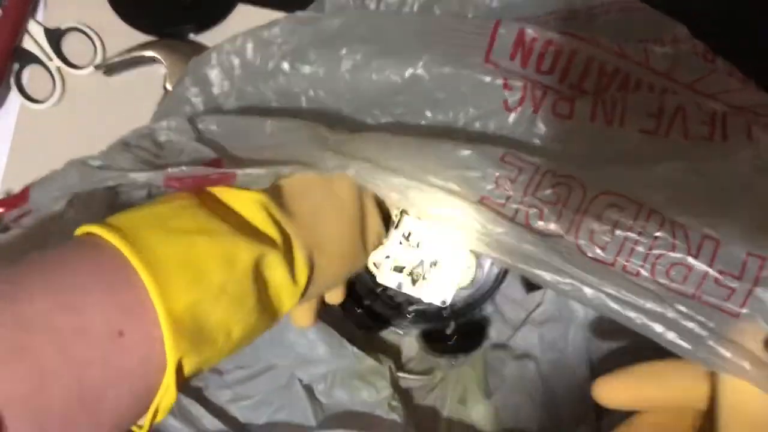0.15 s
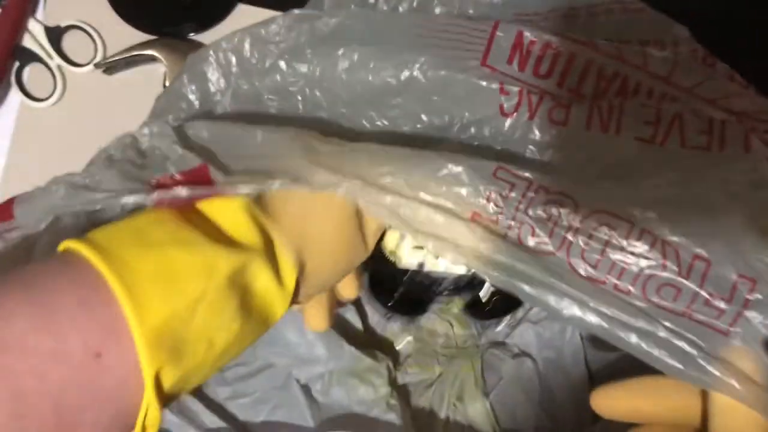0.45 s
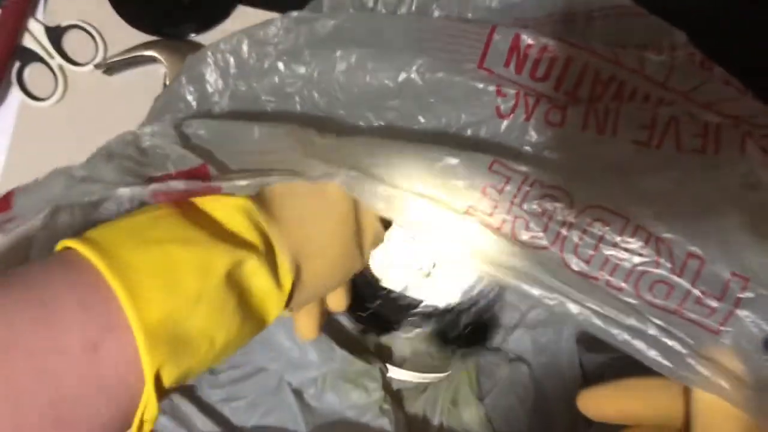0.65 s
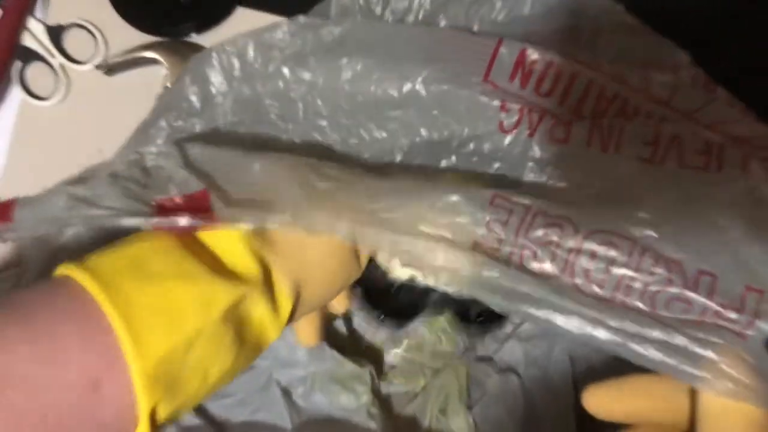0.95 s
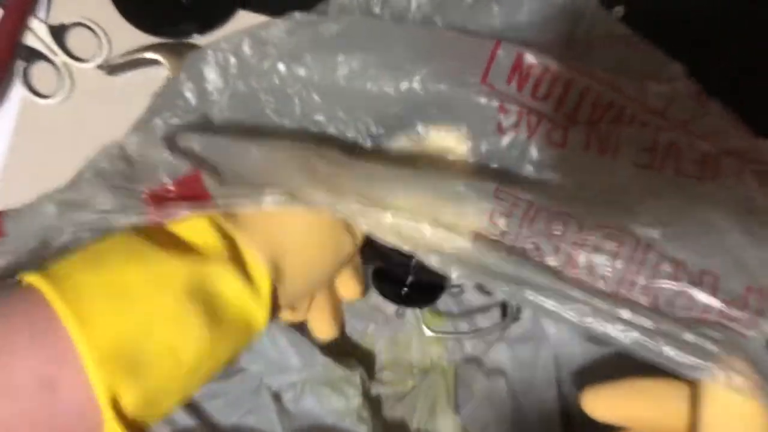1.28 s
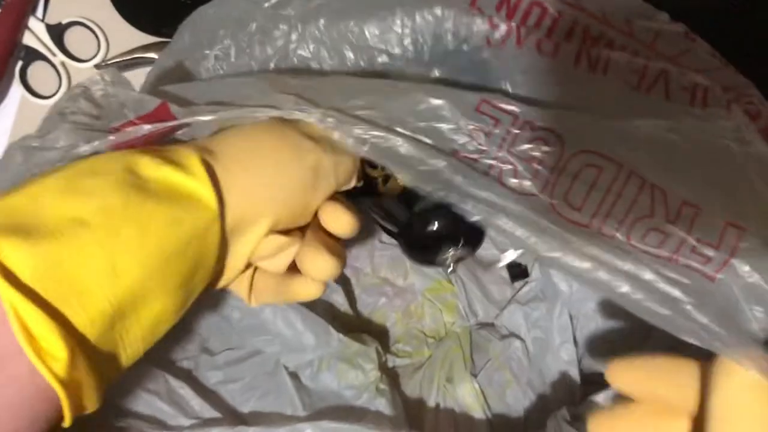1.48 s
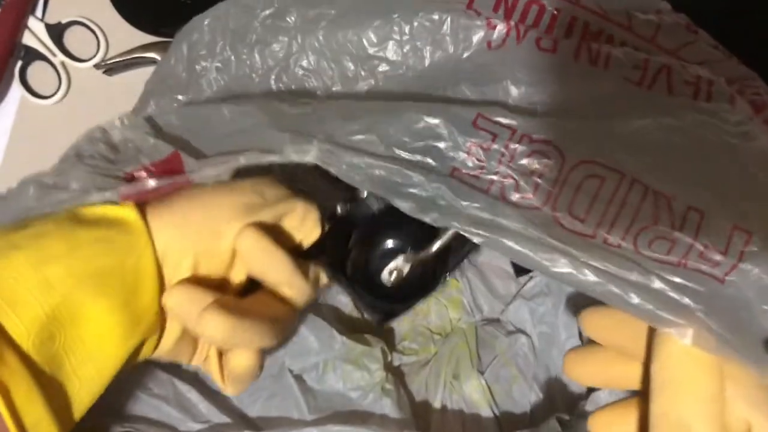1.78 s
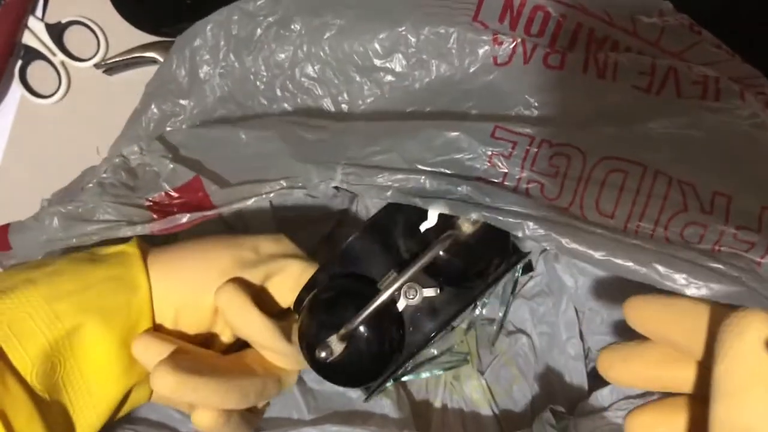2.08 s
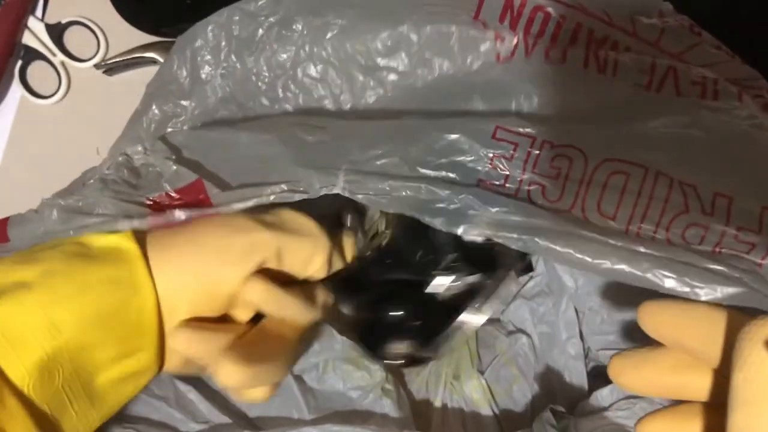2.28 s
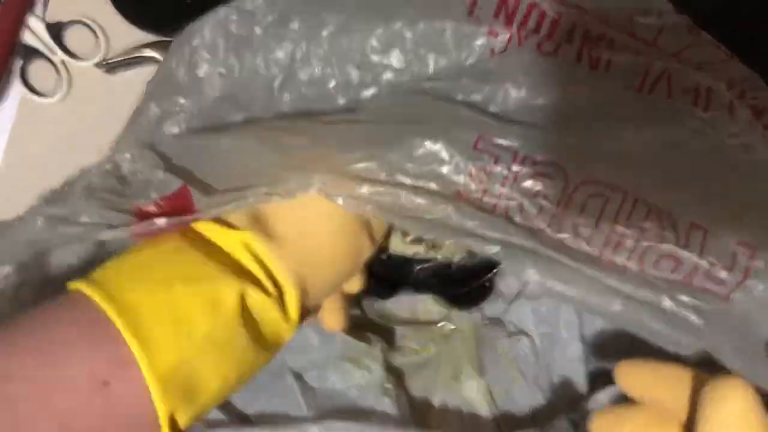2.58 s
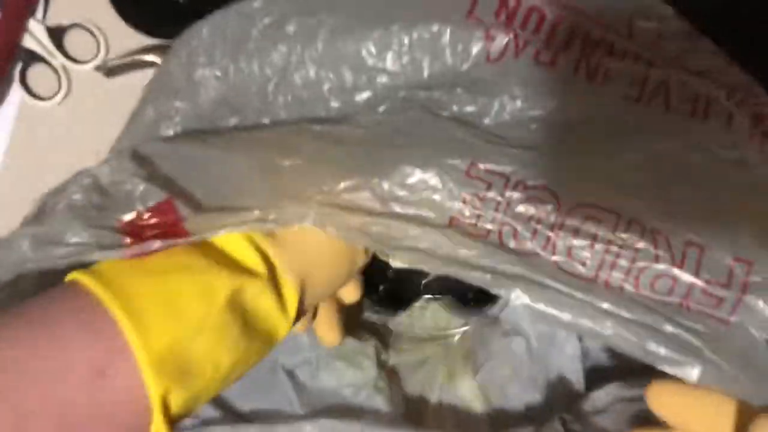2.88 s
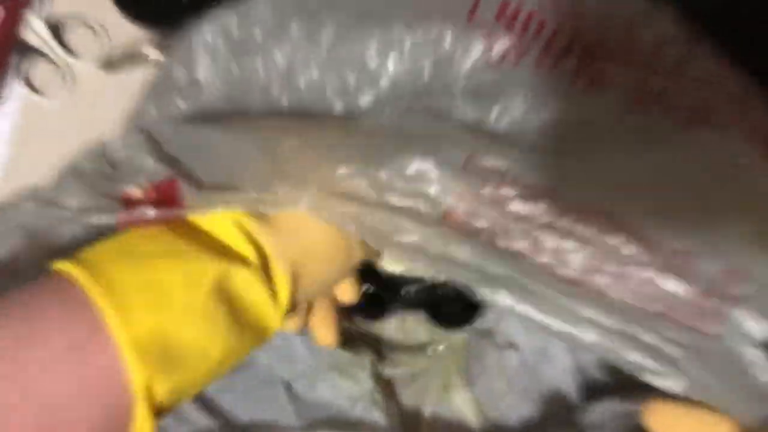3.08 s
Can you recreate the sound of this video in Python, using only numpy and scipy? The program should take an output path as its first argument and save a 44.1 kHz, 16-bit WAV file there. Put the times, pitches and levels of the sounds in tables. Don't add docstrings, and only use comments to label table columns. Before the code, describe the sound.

Broken glass rattles sharply against a hollow clock case shaken in a rustling plastic bag, pauses, then clatters and rings brighter as it is tipped, with table thuds; close phone microphone, quiet room.

```python
import sys
import numpy as np
from scipy import signal
from scipy.fft import rfft, irfft
from scipy.io import wavfile
from scipy.ndimage import uniform_filter1d

SR = 44100
rng = np.random.default_rng(int(sys.argv[2]) if len(sys.argv) > 2 else 0)


def put_to_file(sound):
    columns = np.atleast_2d(sound).T
    safe = np.clip(columns, -1, 1)
    whole_steps = np.round(safe * 32767)
    wavfile.write(sys.argv[1], SR, whole_steps.astype(np.int16))


def gain_from_db(level_db):
    decades = np.asarray(level_db, float) / 20
    return 10 ** decades


N = 143325
T = np.arange(N) / SR


def unit(x):
    return x / np.sqrt(np.mean(x ** 2))


def colour(x, points):
    hz, db = np.array(points).T
    f = np.maximum(np.arange(N // 2 + 1) * SR / N, 1)
    gain = gain_from_db(np.interp(np.log(f), np.log(hz), db, left=-60))
    return irfft(rfft(x) * gain, N)


def walk(rate):
    k = int(SR / rate)
    held = np.repeat(rng.standard_normal(N // k + 1), k)
    return unit(uniform_filter1d(held, k)[:N])


def crackle(rate, spread_db, smear_s):
    clicks = (rng.random(N) < rate / SR) * gain_from_db(spread_db * rng.exponential(size=N))
    envelope = signal.lfilter([1], [1, -np.exp(-1 / (smear_s * SR))], clicks)
    return unit(envelope * rng.standard_normal(N))


def halves(x):
    dull = signal.sosfiltfilt(signal.butter(2, 7800, fs=SR, output="sos"), x)
    return np.array([unit(dull), unit(x - dull)])


def patchy(x, depth_db, rate):
    spectrum = rfft(x)
    octave = np.log2(np.arange(N // 2 + 1) * SR / N + 1)
    total = 0
    for centre in np.arange(10, 15, 0.5):
        band = np.clip(1 - 2 * np.abs(octave - centre), 0, 1)
        total = total + irfft(spectrum * band, N) * gain_from_db(depth_db * walk(rate))
    return unit(total)


def ring(start, hz, t60):
    t = np.maximum(T - start, 0)
    return np.sin(2 * np.pi * hz * t) * np.exp(-np.log(1000) * t / t60), t


def room_hum():
    # f/Hz, level/dB
    room_tone = [(15, -37), (30, -18), (64, 7.5), (120, -7.5), (427, 1), (489, -8), (641, -11),
                 (9070, -21.5), (16000, -30)]
    return unit(colour(rng.standard_normal(N), room_tone)) * gain_from_db(-63 + walk(6.57))


def tinkles():
    out = np.zeros(N)
    t = T[:SR // 20]
    for place, pitch, size in rng.random((400, 3)):
        i = int(place * (N - len(t)))
        ping = np.sin(2 * np.pi * 1400 * 11 ** pitch * t) * np.exp(-t / 0.0015)
        out[i:i + len(t)] += size ** 2 * ping
    return out


def bag():
    # t/s, level/dB
    hand = [(0, -39), (.1, -43.5), (.23, -48.5), (.35, -47.5), (.41, -51), (.6, -47), (.77, -46.5),
            (.9, -45), (1.12, -43.5), (1.3, -46), (1.55, -51), (1.72, -59.5), (2.2, -64.5), (2.33, -44),
            (2.66, -47), (2.92, -41), (3.13, -43.5), (3.25, -45.5)]
    # f/Hz, level/dB
    plastic = [(88, -11), (150, -9), (348, -7), (391, -11), (439, -7), (1760, -7), (13700, -10),
               (16000, -14)]
    motion = gain_from_db(np.interp(T, *np.array(hand).T))
    dull = halves(colour(crackle(4000, 3.2, 0.00091), plastic))[0]
    bright = halves(colour(crackle(4000, 3.2, 0.00091), plastic))[1]
    rustle = gain_from_db(1.0 + 3.13 * walk(35)) * (dull + gain_from_db(-5.5 + 4.9 * walk(24.74)) * bright)
    return motion * (rustle + gain_from_db(7.5) * tinkles())


def knock_power():
    # t/s, peak level/dB, shares of case/dB, thick glass/dB, thin glass/dB
    shake = [(0.007, -26.5, -1.5, -17.5, -20), (0.072, -19.5, -5, -15, -14), (0.114, -18, -13, -11.5, -7),
             (0.136, -3, -28, -13.5, -6.5), (0.157, -17.5, -25, -12, -20), (0.196, -26, 2, -17, -23),
             (0.252, -20.5, -3, -14, -16), (0.315, -15.5, -22, -11, -5), (0.327, -19.5, -1.5, -10.5, -17),
             (0.339, -12.5, -4.5, -11, -13), (0.349, -14, -26.5, -10, -7.5), (0.36, -14.5, -24, -18, -8),
             (0.425, -21, -1, -24, -9), (0.439, -29, -1, -3.5, -11), (0.474, -15, -21, -11, -7),
             (0.488, -14.5, -8, -10.5, -22), (0.508, -16.5, -11, -17, -12), (0.548, -22.5, -7.5, -5.5, -31),
             (0.602, -37, -4, 0, -11), (0.632, -7, -24.5, -5, -20), (0.651, -10.5, -11, -10.5, -17),
             (0.66, -12, -19, -19, -12), (0.713, -18.5, -11, -14, -3), (0.724, -18.5, -18, -20, -4),
             (0.801, -9, -10, -14.5, -7), (0.812, -10, -0.5, -12, -11), (0.822, -13, -20, -5, -21),
             (0.857, -26, -22.5, -15, -5), (0.889, -16, -7, -21, -9.5)]
    late = [
        (0.925, -24, -7, -9, -17),
        (0.978, -3, -2, -10, -9.5),
        (1.031, -20.5, -23, -17, -6),
        (1.095, -24.5, -2.5, -10, -18),
        (1.151, -11.5, -6, -13, -20),
        (1.172, -16.5, -16, -21, -4),
        (1.206, -20, -4.5, -10.5, -19.5),
        (1.258, -24.5, -6.5, -7, -20),
    ]
    tip = [(2.262, -27, -15, -15.5, -11), (2.273, -24, -21, -9, -10), (2.281, -22.5, -21, -9.5, -10),
           (2.305, -20.5, -19.5, -10, -8), (2.333, -7.5, -23.5, -14, -8), (2.445, -13, -25.5, -16, -14),
           (2.459, -6.5, -32, -14, -17), (2.49, -3, -33, -20.5, -10.5), (2.535, -12.5, -10.5, -24, 1.5),
           (2.582, -12.5, -15, -17, -4), (2.665, -23, -11, -16, -9.5), (2.712, -20, -4, -9, -18),
           (2.728, -18, -20, -5.5, -18.5), (2.78, -5, -12, -8.5, -11.5), (2.836, -10.5, -24, -15.5, -9),
           (2.893, -6.5, -28, -16.5, -5), (2.936, -8.5, -23, -18, -12), (2.939, -4.5, -12.5, -14, -13),
           (2.991, -14, -14, -12, -13), (3.001, -10, -31, -20, -7)]
    # t/s, peak level/dB, shares of low/dB, middle/dB, top/dB
    snaps = [
        (1.504, -27.5, -27, -15, -8),
        (1.814, -26.5, -12, -11, -25),
        (1.84, -21, -28, -13, -16),
        (1.856, -24, -30, -11, -16),
        (2.023, -38.5, -16, -6, -6),
    ]
    power = np.zeros((3, N))
    t = T[:SR // 10]
    crack = np.exp(-(t / 0.0035) ** 2)
    tail = gain_from_db(-11) * np.exp(-t / 0.0081)
    shape = (1 - np.exp(-t / 0.00061)) * (crack + tail)
    for s, db, *share_db in list(shake) + list(late) + list(tip) + list(snaps):
        i = int(s * SR)
        shares = gain_from_db(share_db)[:, None]
        power[:, i:i + len(t)] += (gain_from_db(db - 13.5) * shape * shares) ** 2
    return power


def slide_power():
    # middle t/s, level/dB, case share/dB, half length/s, thin over thick glass/dB
    slides = [(0.02, -46, 0, 0.049, 4.5), (0.141, -29.5, -1.5, 0.016, -2.5), (0.265, -43, 0.5, 0.028, -4.5),
              (0.328, -36, -7, 0.019, -4), (0.492, -29, -2.5, 0.021, -0.5), (0.656, -27.5, 0, .016, -2),
              (0.729, -39.5, -10, .011, 4), (.82, -28.5, -2.5, 0.023, 2), (0.883, -38.5, -6, 0.022, 2),
              (.989, -23.5, -1.5, 0.011, 4.5), (1.087, -39, -5, 0.02, 2), (1.158, -25, 1, 0.012, 3.5),
              (1.266, -41, -10, 0.032, -3), (2.351, -36.5, -11, .027, 6), (2.431, -39, -1.5, 0.0139, -7),
              (2.461, -44.5, -6, .008, 5), (2.541, -27, -9, 0.0097, 3), (2.587, -30, 1, 0.024, -0.5),
              (2.722, -36.5, -4, 0.0071, -4), (2.846, -30, -9, 0.011, 2), (2.903, -24.5, -4.5, 0.023, 2),
              (2.941, -26, -3.5, 0.011, 3.5), (3.013, -33.5, -19, 0.0157, 5), (3.061, -34, -8, 0.0146, -3),
              (3.178, -38.5, -4.5, .027, -3)]
    power = np.zeros((3, N))
    rough = gain_from_db(2.46 * walk(250))
    for s, db, case_db, half, tilt_db in slides:
        envelope = gain_from_db(db) * rough * np.exp(-np.abs((T - s) / (0.92 * half)) ** 3.18)
        shares = gain_from_db([case_db, -4 - tilt_db / 2, -5.5 + tilt_db / 2])[:, None]
        power += (envelope * shares) ** 2
    return power


def hollow_case(push):
    # f/Hz, width/Hz, level/dB
    resonances = [(486, 220, -3), (827, 347, -0.5), (1023, 78, 3), (1442, 134, 1.5), (1743, 137, 6),
                  (2114, 113, 1)]
    body = 0
    for k, (hz, width_hz, db) in enumerate(resonances):
        answer = signal.lfilter(*signal.iirpeak(hz, hz / width_hz, SR), push)
        body = body + (-1) ** k * gain_from_db(db) * answer
    return body


def chips():
    # f/Hz, level/dB
    glass = [(1180, -3.5), (2000, -10.5), (2490, -6), (5440, -3.5), (13600, -2), (14800, -1.5),
             (16000, -7.5)]
    knock, slide = knock_power(), slide_power()
    scrape = halves(patchy(colour(crackle(7900, 1.4, 0.00055), glass), 2.1, 150))
    crack = halves(patchy(colour(rng.standard_normal(N), glass), 3.9, 120))
    chip_sound = np.sqrt(slide[1:]) * scrape + gain_from_db(9) * np.sqrt(knock[1:]) * crack
    push = np.sqrt(slide[0]) * crackle(2500, 3.3, 0.00015)
    push += gain_from_db(4) * np.sqrt(knock[0]) * rng.standard_normal(N)
    return chip_sound.sum(axis=0) + gain_from_db(11.5) * hollow_case(push)


def thumps():
    # t/s, level/dB, hollow knock/dB, drum share/dB, leg sway/dB
    hits = [
        (.136, -23.5, -21, 2.5, -60.5),
        (.492, -32.5, -21, -4.5, -63.5),
        (0.658, -34, -29, -3, -59.5),
        (.815, -30.5, -22.5, 0.5, -64),
        (0.98, -29, -19, 0, -72),
        (1.155, -30, -28, -6, -57.5),
        (2.428, -40.5, -47, 2.5, -58),
        (2.576, -22, -7, -3, -42.5),
        (2.895, -18.5, -19.5, 4.5, -42.5),
    ]
    # f/Hz, level/dB, time to fall 60 dB/s
    table_top = [(44.6, -19, 0.47), (136.9, -9, 0.24), (188.15, -4.5, .13), (213.8, -18.5, 0.37),
                 (344.3, -12, 0.15), (450.4, -4, 0.0704)]
    out = 0
    for s, db, knock_db, drum_db, sway_db in hits:
        drum = (282.7, drum_db + 6, 0.051)
        for hz, mode_db, t60 in list(table_top) + [drum]:
            tone, t = ring(s, hz, t60)
            swell = 1 - np.exp(-t * hz / 0.53)
            out = out + gain_from_db(db + mode_db) * tone * swell
        sway, t = ring(s, 76.2, 2.9)
        out = out + gain_from_db(sway_db + 3.5) * sway * np.sin(np.pi * 4.04 * t)
        knock, t = ring(s - 0.002, 855, 0.012)
        out = out + gain_from_db(knock_db + 9) * knock * (1 - np.exp(-t / 0.0015))
    return out


def shards():
    # t/s, level/dB, flight/s
    ringing = [
        ([(5340, 0.5, 0.15), (7520, -14, 0.275), (12660, -1.5, .2), (14740, -12, 0.36)], [(2.282, -35, .14), (2.325, -29.5, 0.104), (2.447, -27.5, .085), (2.46, -15.5, 0.01), (2.468, -37, .06), (2.491, -27, 0.034), (3.003, -32, 0.0286), (3.102, -36.5, 0.011)]),
        ([(11450, -.5, 0.061)], [(2.337, -29, .02), (2.452, -11, 0.015), (2.461, -14, 0.036), (2.491, -12, .045)]),
        ([(14070, 1, 0.097)], [(2.452, -25, .02), (2.491, -15, .035)]),
        ([(7165, -0.5, 0.19)], [(2.461, -16.5, .06), (2.714, -48, 0.01), (2.895, -26, 0.011), (3.003, -23, 0.03)]),
        ([(9985, -2, 0.052), (4630, -10.5, 0.067), (15590, -7, .09)], [(2.491, -15, 0.045), (2.933, -18, 0.037), (3.004, -22, 0.028)]),
        ([(12250, 1.5, 0.22), (15620, -11.5, .15)], [(.858, -33, .005), (2.838, -24.5, 0.0073), (2.933, -22, 0.054)]),
        ([(14500, 0.5, 0.134)], [(.83, -27, .004), (.94, -37.5, .014), (1.045, -36, 0.018), (1.22, -35.5, .03)]),
    ]
    out = 0
    for modes, clinks in ringing:
        for hz, mode_db, t60 in modes:
            power = 0
            for s, db, flight in clinks:
                t = np.maximum(T - s, 0)
                landing = np.maximum(t - flight, 0) / 0.0018
                fade = np.log(1000) * t / t60 + landing
                attack = np.minimum(t / 0.00035, 1)
                power = power + (gain_from_db(db + mode_db) * attack * np.exp(-fade)) ** 2
            out = out + np.sqrt(power) * np.sin(2 * np.pi * hz * T) * gain_from_db(1.94 * walk(150))
    return out


def room_echo(near):
    t = T[:SR // 3]
    tail = rng.standard_normal(len(t)) * np.exp(-np.log(1000) * t / 0.36)
    tail *= t > 0.004
    return signal.fftconvolve(near, tail / np.sqrt(np.sum(tail ** 2)))[:N]


def scene():
    near = bag() + chips() + thumps() + shards()
    return (near + gain_from_db(-13.5) * room_echo(near) + room_hum())[None]


def band_limit(x):
    return signal.sosfilt(signal.butter(12, 17030, fs=SR, output="sos"), x)


def record(dry):
    low_pass = signal.ellip(12, 0.2, 45, 15850, fs=SR, output="sos")
    return band_limit(signal.sosfilt(low_pass, dry))


dry = scene()
out = record(dry)
put_to_file(out)
```